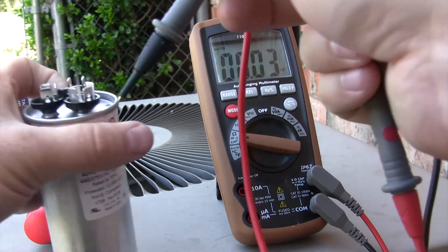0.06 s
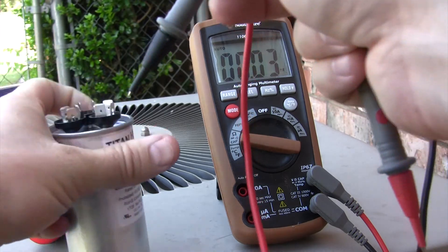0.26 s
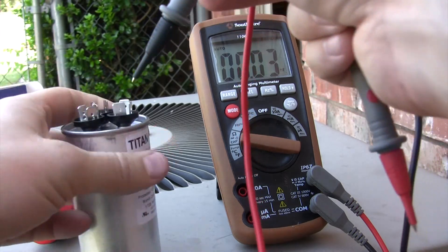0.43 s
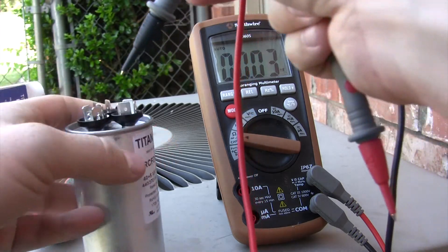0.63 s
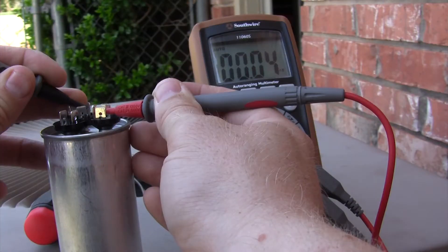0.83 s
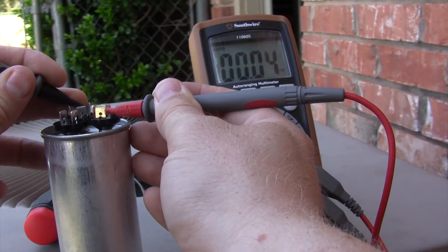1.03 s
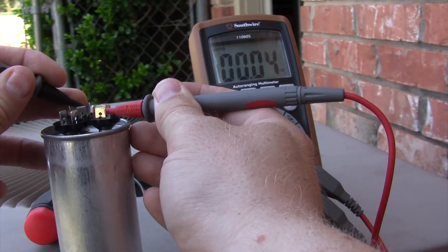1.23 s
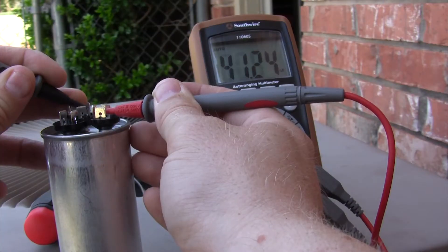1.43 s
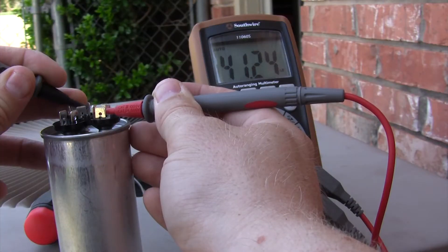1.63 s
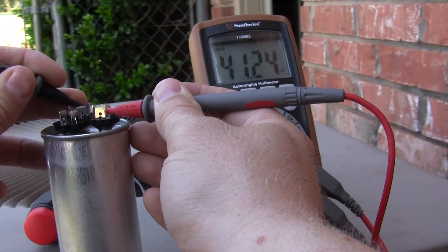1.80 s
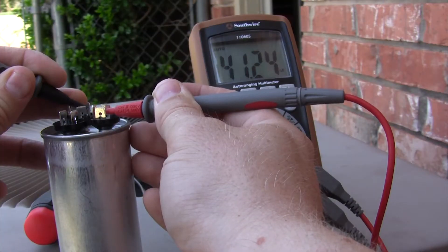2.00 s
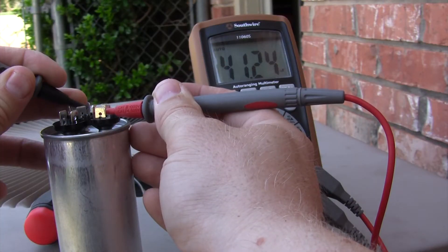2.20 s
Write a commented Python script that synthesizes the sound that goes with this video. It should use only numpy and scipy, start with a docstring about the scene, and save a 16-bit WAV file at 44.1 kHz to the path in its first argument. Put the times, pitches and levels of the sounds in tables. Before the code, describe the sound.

A metal can bangs down on an outdoor unit's steel lid, close by, ringing briefly and scraping lightly as wind buffets the microphone. The sound then cuts abruptly to a faint, distant motor hum in open air.

```python
"""A gust buffets the stereo microphone, and a metal can comes down hard on the sheet-steel lid of an
outdoor unit close by. Its rim cracks against the lid, it lands flat, and the casing booms and rings.
The can is nudged and scrapes in short slides. Then an abrupt cut to a quieter moment outdoors:
a distant motor and the mains hum over open air."""
import sys
import numpy as np
from scipy import signal
from scipy.io import wavfile
from scipy.ndimage import uniform_filter1d

SR = 44100
rng = np.random.default_rng(int(sys.argv[2]) if len(sys.argv) > 2 else 0)


def log_audio(samples):
    """Write samples as a 16-bit WAV file to the path given in sys.argv[1]."""
    # one column per channel
    frames = np.atleast_2d(samples).T
    # limit to full scale, then quantise
    limited = np.clip(frames, -1, 1)
    pcm = np.round(limited * 32767).astype(np.int16)
    wavfile.write(sys.argv[1], SR, pcm)


N = 103635
T = np.arange(N) / SR
CUT_S = 0.710   # the cut to the quiet moment

# the can meets the lid, rim first, then flat: t/s, blow level/dB, relative crack level/dB, crack top/Hz
CONTACTS = [(0.2497, 1, 2, 2300), (0.2570, -17, -3, 1220)]
# clear modes of the lid and casing: f/Hz, level/dB, t60/s
LID_MODES = [(204.3, -7.5, 0.088), (215.7, -21, .9), (334, -34.5, 1), (387, -25, 1), (435.8, -23, 0.62),
             (564, -31.5, 0.45), (600.7, -27, 0.9), (633.6, -26, 0.89), (766.6, -25, 0.44),
             (966, -23.5, 0.65), (998.5, -20, 0.63), (1051, -17.5, 0.31), (1103, -29, 0.2),
             (1289, -29, 0.48), (1395, -16, 0.15), (1596, -29.5, 0.79), (1772, -26.5, 0.23)]
# bright modes of the can: f/Hz, level/dB, t60/s
CAN_MODES = [(2290, -43.5, 0.9), (2484, -40, 0.34), (2633, -38.5, 0.68), (2880, -27, 0.18),
             (3126, -20, 0.086), (3184, -23.5, 0.067), (3460, -20.5, 0.06), (4130, -47, 0.65),
             (4300, -25.5, 0.059), (4585, -20, 0.044), (4856, -44, 0.23), (6848, -61, 0.18)]
# the casing's countless weaker modes: f/Hz, level in an octave/dB, typical t60/s
CASING_MODES = [(131.05, -28, 0.6), (281, -22.5, 1.68), (493, -22, 0.72), (1080, -21, 0.72),
                (2000, -25, 0.5), (3100, -23, 0.23), (4530, -22.5, 0.21), (6900, -25, 0.12),
                (10260, -38.5, 0.17), (15004, -41, 0.15)]
# spectrum of the rim crunching on paint: f/Hz, relative level/dB
CRUNCH_SPECTRUM = [(1500, -14), (3500, 8), (6000, 3), (9000, -12), (15000, -11)]

# the can's slides on the lid: t/s, half-length/s, level/dB, grit relative to grumble/dB
SLIDES = [(0.387, 0.023, -28.5, -19.5), (0.427, 0.055, -35, -15), (0.656, 0.014, -36.5, -26),
          (0.71, 0.024, -39.5, -17)]
# spectra of the lid's grumble and the grit under the can: f/Hz, relative level/dB
GRUMBLE_SPECTRUM = [(100, -24), (220, 7.5), (400, 13), (650, 6.5), (1100, -11), (1700, -17), (2800, -21),
                    (6000, -49)]
GRIT_SPECTRUM = [(600, -11), (1800, 3), (2700, 6), (4200, 1), (8000, -9.5), (15000, -23)]

# wind pressure on the microphone: t/s, level/dB
GUST = [(0.01, -43), (0.1, -41), (0.125, -28.5), (0.16, -25.5), (0.178, -37), (0.205, -13), (0.235, -29),
        (0.26, -23), (0.3, -33), (0.37, -22), (0.398, -20), (0.455, -20), (0.5, -20.5), (0.54, -11.5),
        (0.575, -34.5), (0.655, -36), (0.705, -48)]
# spectrum of the turbulence, ahead of its low-pass: f/Hz, relative level/dB
WIND_SPECTRUM = [(25, -10), (42, -18), (65, 3.5), (130, 4), (200, -6), (350, -18), (520, -60), (1000, -45),
                 (3000, -54.5)]

# distant motor, mains and other machinery: multiple (rounded in use), level/dB, left minus right/dB
MOTOR_TONES = [(5, -68, 5), (8, -71.5, 18), (9, -50, 2), (10, -68, 5), (11, -73, -12), (12, -71, 7),
               (18, -75.5, 11), (20, -74, -6), (24, -83, -5)]
MAINS_TONES = [(1, -73, -4), (2, -68.5, 13), (4, -66.5, 7), (10, -76.5, 0), (26, -68.5, 0),
               (30, -72.5, 2.5), (38, -81.5, -4), (100, -86, -13), (104.4, -82.5, -11), (112, -88, -4),
               (113.5, -91, -5), (115.4, -86, -12), (114, -95, -6)]
DRONE_TONES = [(30.1, -77, 16), (71, -65.5, -2.5), (139, -68, 3.5), (145, -68.5, -7), (202, -63.5, 5),
               (352, -72, 12)]

# spectra of the outdoor air before and after the cut: f/Hz, relative level/dB
AIR_BEFORE = [(30, 14.5), (200, -1.5), (400, -3.5), (900, -6), (1500, -14), (2300, -16), (4500, -17.5),
              (7000, -21), (10000, -29), (15000, -31)]
AIR_AFTER = [(25, -13), (70, -12), (110, -13), (160, -6), (260, -14), (400, -15), (700, -18), (1200, -20.5),
             (2000, -28), (3500, -30), (5500, -34.5), (8000, -40.5), (12000, -46), (15000, -46),
             (17000, -62)]
# how alike the air is in the two channels: f/Hz, correlation
AIR_LIKENESS = [(40, 0.61), (150, 0.33), (500, 0.2), (1500, 0.15), (4000, 0.083), (12000, 0.033)]


def can_on_lid(crack_gain_db=14, crack_low_hz=350):
    """Close by, each contact cracks and shakes the casing; the first sets lid and can ringing."""
    blows, cracks = np.zeros(N), np.zeros(N)
    for k, (s, blow_db, crack_db, top_hz) in enumerate(CONTACTS):
        click = signal.unit_impulse(N, int(s * SR))
        blows += from_db(blow_db) * click
        cracks += (-1) ** k * from_db(crack_gain_db + crack_db) * butter(click, top_hz, "low")
    first_blow = blows * (T <= CONTACTS[0][0])
    ringing = sum((-1) ** (k + 1) * from_db(db) * ring(first_blow, hz, t60)
                  for k, (hz, db, t60) in enumerate(LID_MODES + CAN_MODES))
    boom = signal.fftconvolve(blows[None], casing_response(), axes=1)[:, :N]
    return ringing + boom + butter(cracks, crack_low_hz, "high", order=1)


def casing_response(count=900, spread_rad=0.24, diffuse_hz=5900, decay_spread=0.28):
    """A dense cloud of sheet-metal modes: the high ones die first and spread widest in stereo."""
    t = T[:int(CUT_S * SR)]
    hz = np.linspace(np.sqrt(CASING_MODES[0][0]), np.sqrt(CASING_MODES[-1][0]), count) ** 2
    octaves = np.gradient(np.log2(hz))   # spacing between neighbours
    hz = hz * 2 ** (octaves * rng.uniform(-0.49, 0.53, count))
    gains = from_db(at_hz(CASING_MODES, hz)) * np.sqrt(2 * octaves)
    phases = rng.uniform(0, 2 * np.pi, count)
    stereo_shifts = rng.standard_normal(count) * (spread_rad + hz / diffuse_hz) / 2
    t60s = at_hz(CASING_MODES, hz, axis=2) * np.exp(decay_spread * rng.standard_normal(count))
    response = np.zeros((2, len(t)))
    for f, gain, phase, shift, t60 in zip(hz, gains, phases, stereo_shifts, t60s):
        age = t[:int(1.2 * t60 * SR)]
        mode = gain * np.exp((2j * np.pi * f - np.log(1000) / t60) * age + 1j * phase)
        response[:, :len(age)] += (mode * np.exp([[1j * shift], [-1j * shift]])).real
    return response


def rim_crunch(level_db=-18, decay_s=0.0036):
    """The rim's edge crunches on the paint at first touch: a short, bright burst."""
    age = T - CONTACTS[0][0]
    envelope = (age >= 0) * np.exp(-np.abs(age) / decay_s)
    return from_db(level_db) * envelope * noise(CRUNCH_SPECTRUM, [(3000, 0.9), (12000, .35)], flicker_db=4)


def can_sliding(grains_per_s=4000, roughness=0.5):
    """The nudged can slides in swells of uneven friction: the lid grumbles under a thin grit."""
    touches = (rng.random(N) < grains_per_s / SR) * rng.exponential(1, N)
    grain = rms_one(butter(touches, 95, "low", order=1))
    friction = rms_one(1 + roughness * (grain - 1))
    grumble = noise(GRUMBLE_SPECTRUM, [(500, 0.97)], flicker_db=4)
    grit = noise(GRIT_SPECTRUM, [(2000, .8), (8000, 0.31)], flicker_db=2)
    slides = 0
    for s, half_s, db, grit_db in SLIDES:
        swell = from_db(db) * np.exp(-.5 * ((T - s) / half_s) ** 2)
        slides += swell * (grumble + from_db(grit_db) * grit)
    return friction * slides


def wind_on_microphone(top_hz=600, pan_db=1.5):
    """Lumpy low turbulence pushes the microphone's two ports, mostly in opposite senses."""
    pressure = from_db(np.interp(T, *np.transpose(GUST)))
    rumble = butter(noise(WIND_SPECTRUM, [(100, -0.8)], flicker_db=0.5), top_hz, "low")
    power = uniform_filter1d(np.mean(rumble ** 2, axis=0), size=1100)   # over 25 ms
    even_rumble = rumble / np.sqrt(power + 1e-9)
    return pressure * even_rumble * from_db([[pan_db], [-pan_db]])


def eddy_thump(at_s=0.477, width_s=0.0013, peak_db=1.5, right_gain=-0.46):
    """One strong eddy thumps the two ports in opposite senses."""
    offset = (T - at_s) / width_s
    pulse = from_db(peak_db) * offset * np.exp((1 - offset ** 2) / 2)
    return pulse * np.array([[1], [right_gain]])


def machine_hum(tones, base_hz, waver_db=0.83, speed_wander=0.00015):
    """A machine in the distance: tones on whole multiples of one rate, wavering in speed and level."""
    clock = T + speed_wander * np.cumsum(drift(5.3)) / SR
    hum = 0
    for multiple, db, pan_db in tones:
        rms = from_db(db + waver_db * drift(0.79) + np.array([[pan_db], [-pan_db]]) / 2)
        cycles = round(multiple) * base_hz * clock + rng.random()
        hum += np.sqrt(2) * rms * np.sin(2 * np.pi * cycles)
    return hum


def outdoor_air(spectrum, level_db, flicker_db):
    """Open air all round the microphone: a soft wash, widest in the treble."""
    return from_db(level_db) * noise(spectrum, AIR_LIKENESS, flicker_db)


def noise(spectrum, likeness, flicker_db):
    """Stereo noise of rms 1 in flickering half-octave bands; likeness lists f/Hz, correlation."""
    edges = 22 * 2 ** np.arange(0, 10, .5)
    white = rng.standard_normal((2, 2, N))
    total = 0
    for k, (low, high) in enumerate(zip(edges, edges[1:])):
        hz = np.sqrt(low * high)
        mid, side = butter(white[k % 2], [low, high], "band")
        alike = at_hz(likeness, hz)
        pair = np.sqrt(1 + alike) * mid + np.sqrt(1 - alike) * side * np.array([[1], [-1]])
        total += from_db(at_hz(spectrum, hz) + flicker_db * drift(3.3)) * pair
    return rms_one(total)


def ring(drive, hz, t60):
    """One mode: a unit click starts a decaying sine of height 1."""
    r, w = from_db(-60 / (t60 * SR)), 2 * np.pi * hz / SR
    return signal.lfilter([0, np.sin(w)], [1, -2 * r * np.cos(w), r * r], drive + 1e-18)


def drift(rate_hz):
    """Slow random wander of rms 1, drawn every 40 samples."""
    r = np.exp(-80 * np.pi * rate_hz / SR)
    slow = signal.lfilter([1], [1, -2 * r, r * r], rng.standard_normal(N // 40 + 2002))[2000:]
    return np.interp(np.arange(N) / 40, np.arange(len(slow)), rms_one(slow))


def butter(x, hz, kind, order=2):
    """Causal Butterworth filter."""
    sections = signal.butter(order, np.clip(hz, 10, .45 * SR), kind, fs=SR, output="sos")
    return signal.sosfilt(sections, x + 1e-18)


def at_hz(points, hz, axis=1):
    """Read a table's column on a log-frequency axis."""
    table = np.array(points)
    return np.interp(np.log(hz), np.log(table[:, 0]), table[:, axis])


def from_db(db):
    """Decibels to gain."""
    return 10 ** (np.asarray(db) / 20)


def rms_one(x):
    """Scale to rms 1."""
    return x / np.sqrt(np.mean(x ** 2) + 1e-20)


def scene():
    """Can and wind up close, then the cut to distant hum and still air."""
    motor = machine_hum(MOTOR_TONES, base_hz=58.92)
    mains = machine_hum(MAINS_TONES, base_hz=59.983)
    drone = machine_hum(DRONE_TONES, base_hz=0.95, waver_db=3)
    hum = motor + mains + drone
    close = can_on_lid() + rim_crunch() + can_sliding() + wind_on_microphone() + eddy_thump()
    before = close + from_db(-0.5) * hum + outdoor_air(AIR_BEFORE, level_db=-44, flicker_db=1.9)
    after = hum + outdoor_air(AIR_AFTER, level_db=-51.5, flicker_db=0.57)
    return np.where(T < CUT_S, before, after)


def record(dry):
    """The recorder clips peaks at full scale and cuts the treble above 16.1 kHz."""
    lowpass = signal.ellip(10, .1, 80, 16100, fs=SR, output="sos")
    return signal.sosfilt(lowpass, np.clip(dry, -1, 1))


dry = scene()
out = record(dry)
log_audio(out)
```